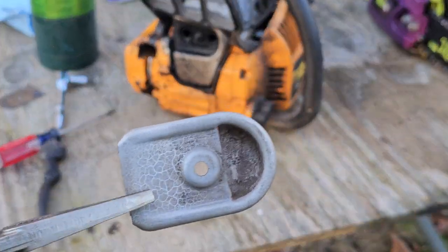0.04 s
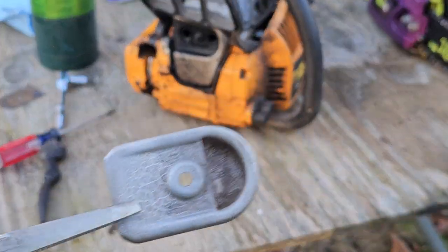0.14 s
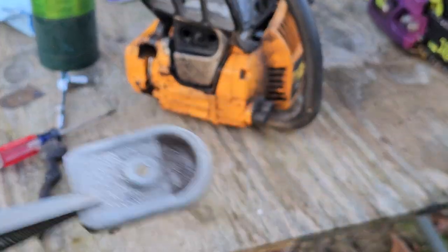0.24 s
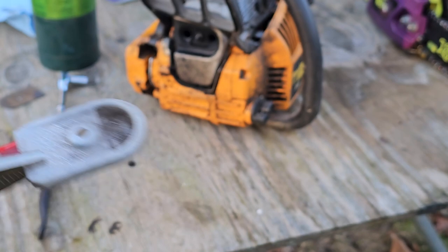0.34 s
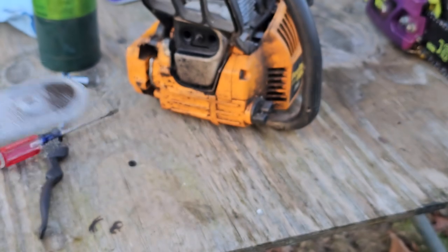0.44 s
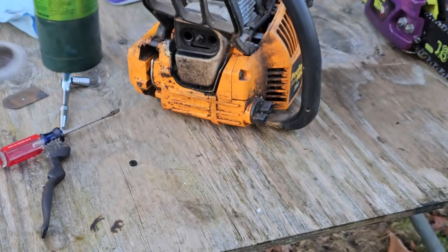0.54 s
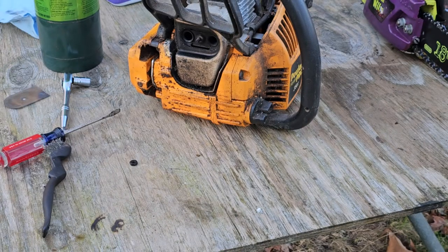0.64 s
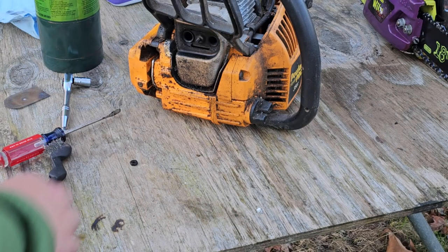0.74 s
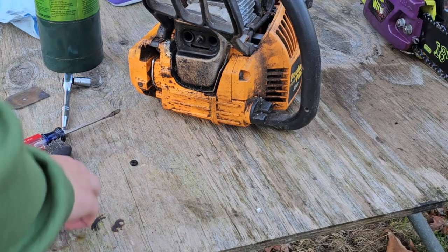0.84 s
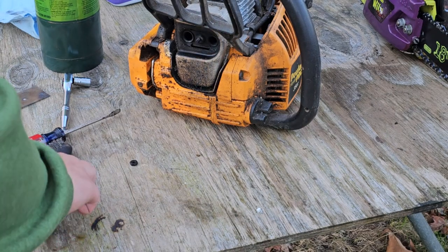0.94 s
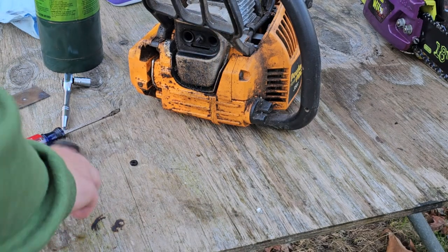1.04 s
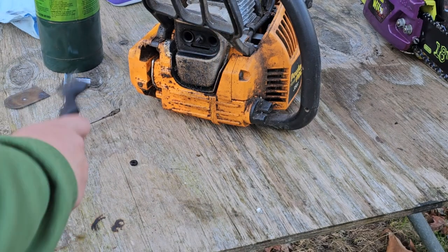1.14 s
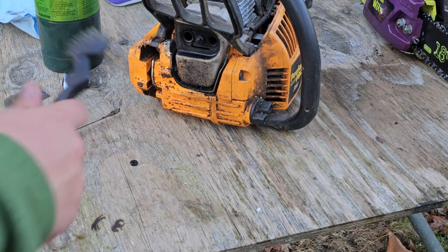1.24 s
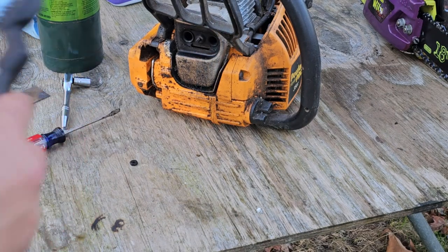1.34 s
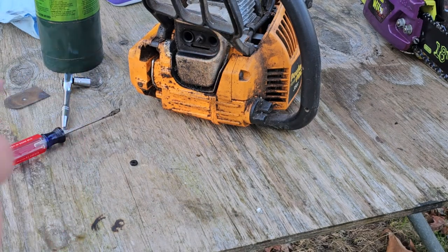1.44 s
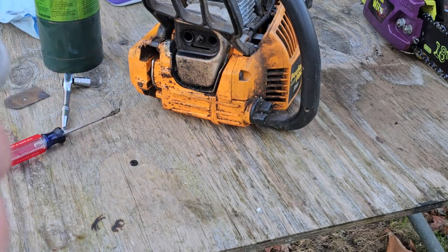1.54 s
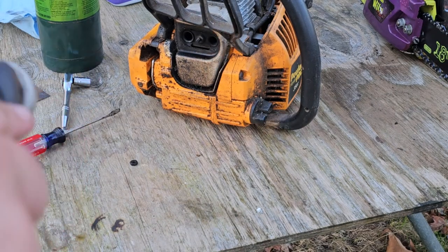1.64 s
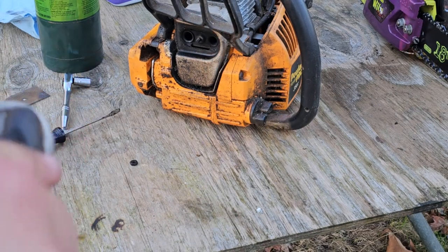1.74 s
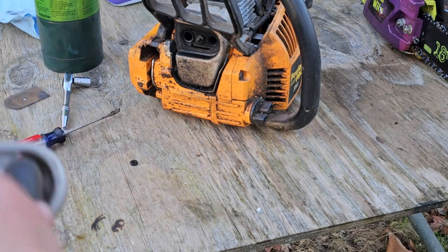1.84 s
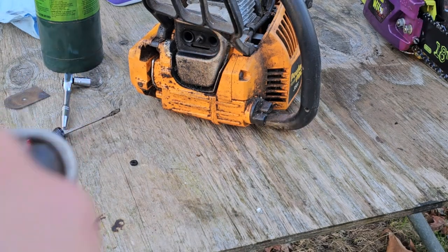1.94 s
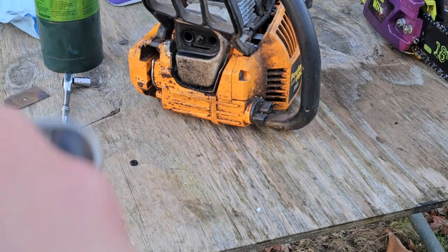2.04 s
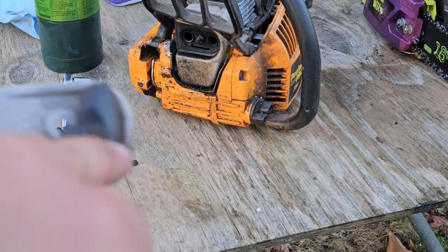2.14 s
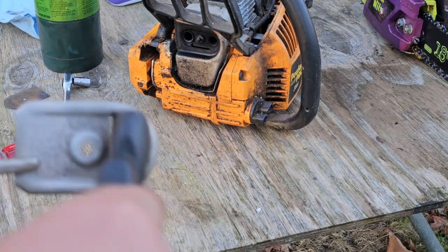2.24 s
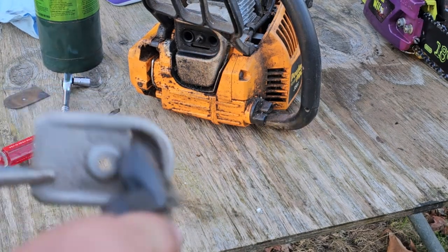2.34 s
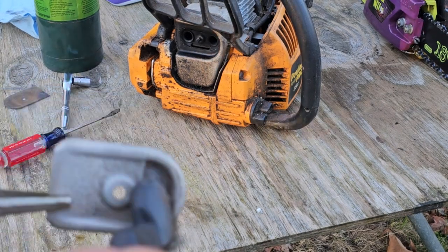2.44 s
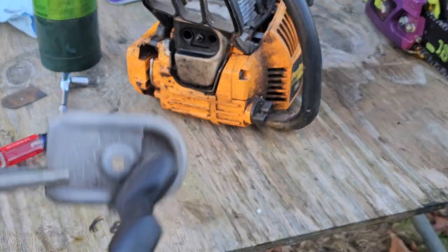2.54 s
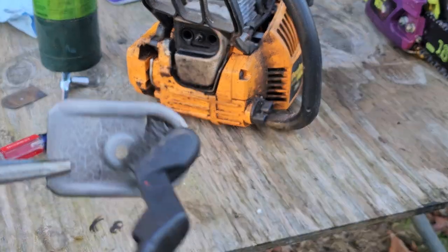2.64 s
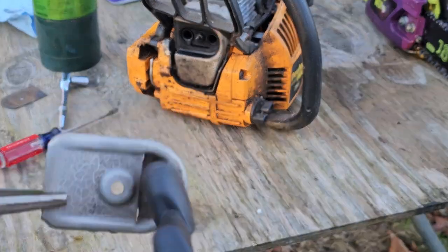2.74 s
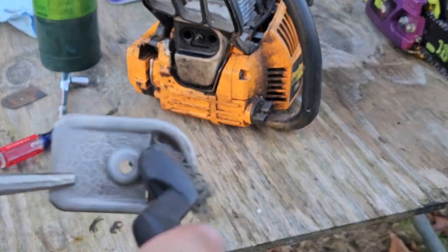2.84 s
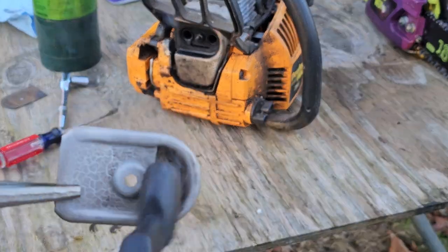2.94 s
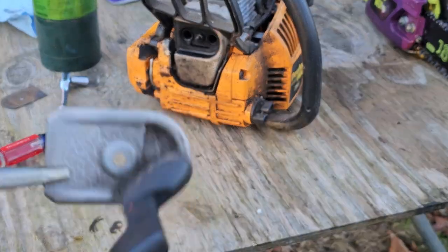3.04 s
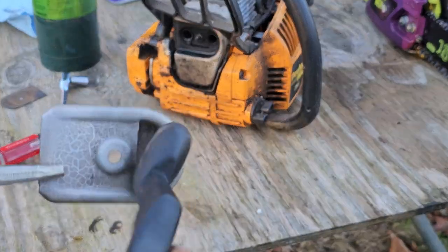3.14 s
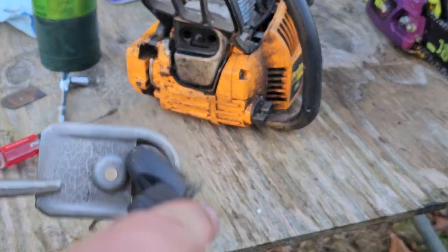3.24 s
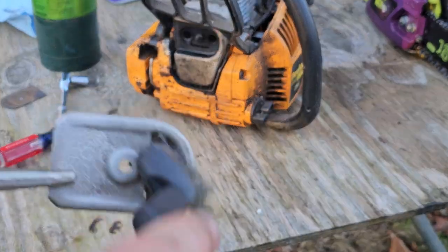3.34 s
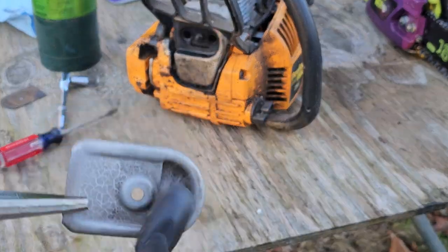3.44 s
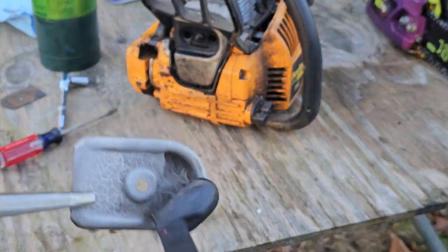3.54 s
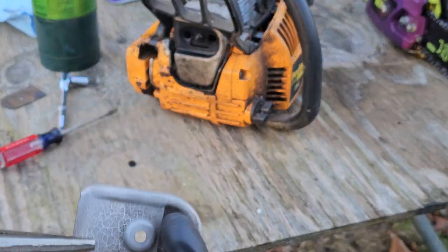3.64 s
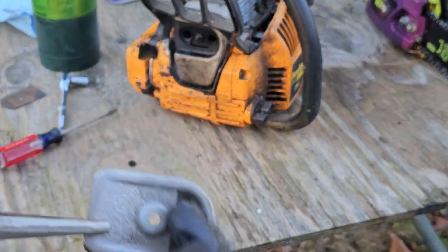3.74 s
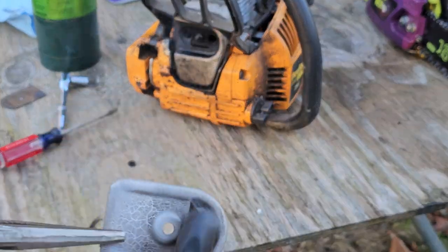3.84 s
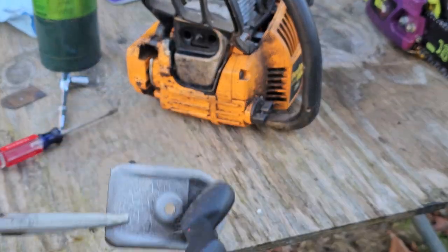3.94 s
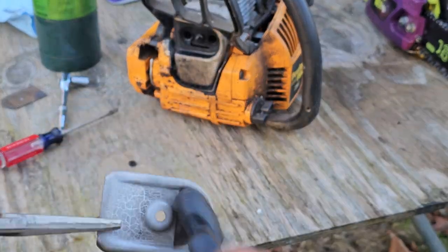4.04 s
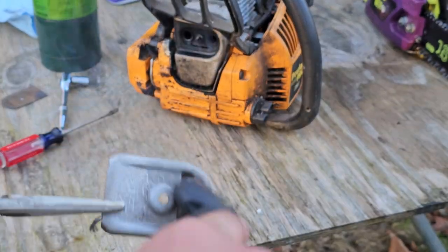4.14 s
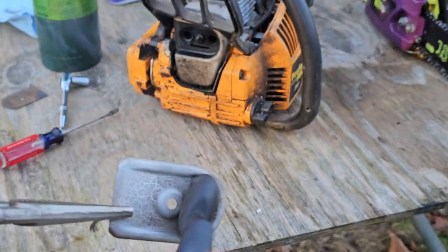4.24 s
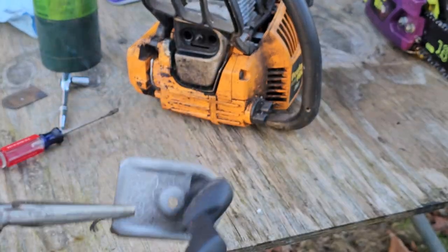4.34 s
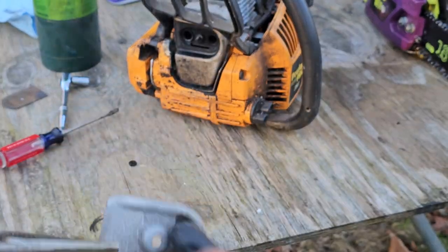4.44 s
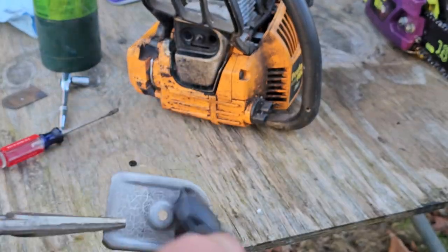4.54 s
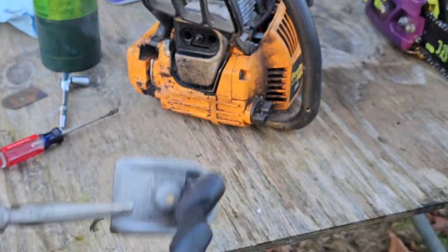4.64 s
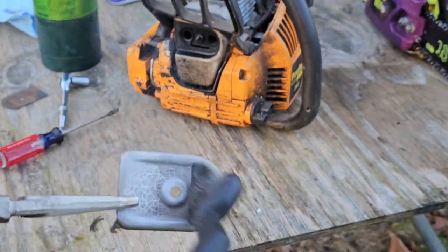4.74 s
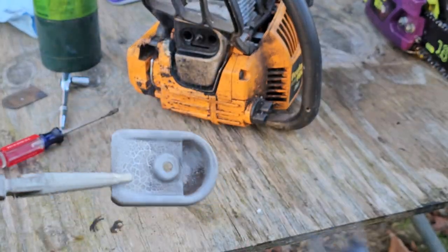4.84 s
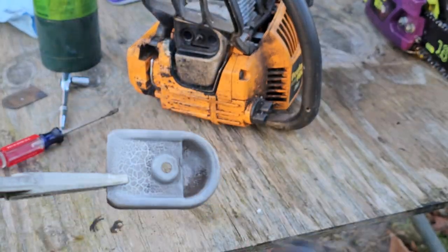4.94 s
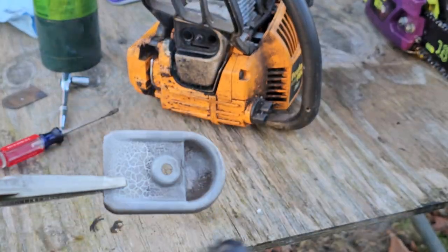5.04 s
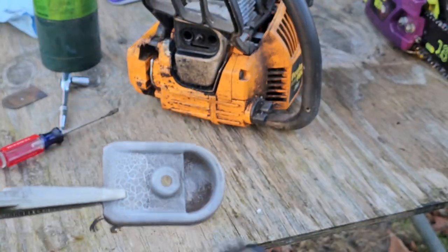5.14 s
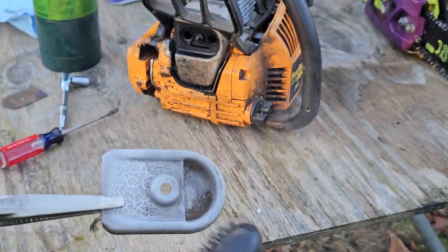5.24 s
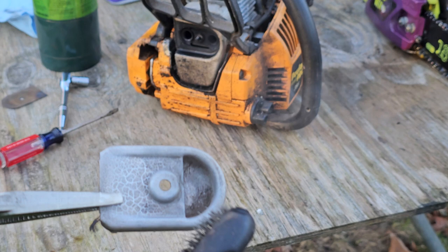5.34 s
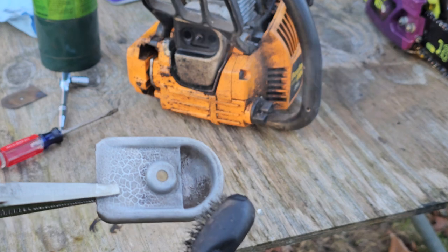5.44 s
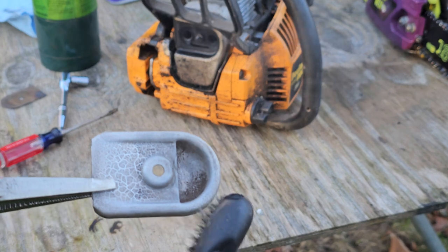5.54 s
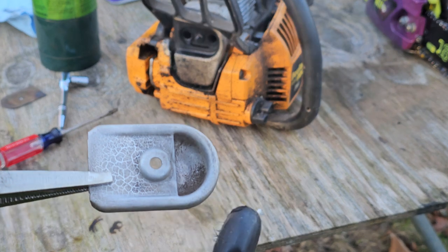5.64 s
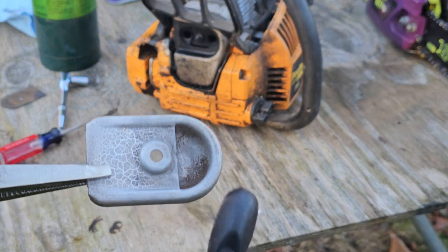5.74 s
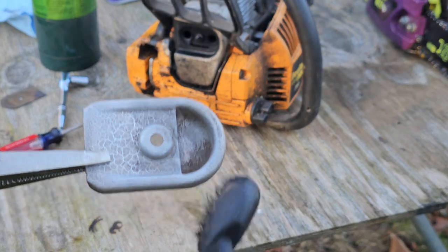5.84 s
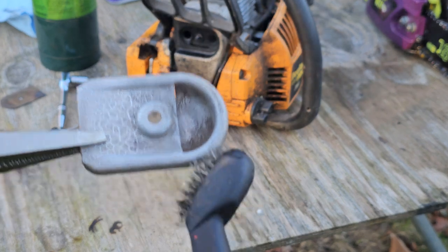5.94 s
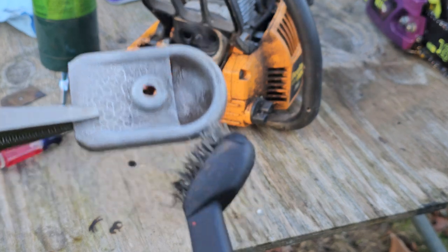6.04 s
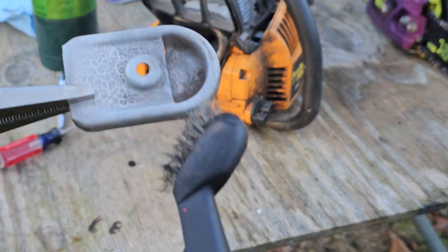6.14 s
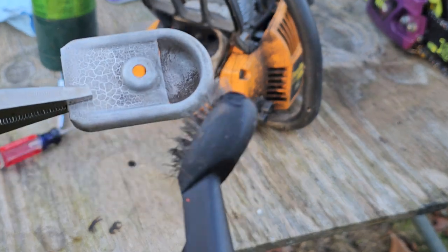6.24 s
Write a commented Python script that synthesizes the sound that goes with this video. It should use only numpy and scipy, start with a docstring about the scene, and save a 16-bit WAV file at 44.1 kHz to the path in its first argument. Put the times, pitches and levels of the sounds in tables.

```python
"""A distant engine drones first, sinking overall in pitch amid outdoor rush, rumble and faint cloth hiss: harmonics and noise.
A plastic-handled wire brush knocks on a plywood bench, then scrubs a pressed-steel muffler plate held in pliers.
Strokes swell and die with the hand: random wire flicks, bunched by stick-slip, drive the plate's resonances.
Tufts snap off the rim and shifting hands tick: short noise bursts excite modes. Two light rim touches come last."""
import sys
import numpy as np
from scipy import signal
from scipy.fft import rfft, irfft, next_fast_len
from scipy.io import wavfile
from scipy.ndimage import uniform_filter1d

SR = 44100
rng = np.random.default_rng(int(sys.argv[2]) if len(sys.argv) > 2 else 0)


def store_wav(level_fs):
    """Save 16-bit WAV to argv[1]."""
    pcm = np.round(np.clip(np.atleast_2d(level_fs), -1, 1) * 32767)
    wavfile.write(sys.argv[1], SR, pcm.T.astype(np.int16))


N = 278182
T = np.arange(N) / SR
SIZE = next_fast_len(N + SR // 4, True)  # leaves room for filter tails
FREQS = np.arange(SIZE // 2 + 1) * SR / SIZE
TOP_HZ = 15850  # upper edge of the recorded band


def undb(db):
    """Decibel law: amplitude gain grows tenfold every 20 dB."""
    return 10 ** (np.asarray(db) / 20)


def unit(x):
    """Normalization to a root-mean-square of 1."""
    return x / np.sqrt(np.mean(x ** 2))


def curves(rows):
    """Linear interpolation of each table column through time."""
    s, *columns = np.transpose(rows)
    return [np.interp(T, s, c) for c in columns]


def shape(points):
    """Spectral envelope: gain from f/Hz and level/dB points, interpolated over log frequency."""
    hz, db = np.transpose(points)
    return undb(np.interp(np.log(FREQS + 1), np.log(hz), db))


def below(hz):
    """Butterworth magnitude of order 8: a steep low-pass."""
    return 1 / np.sqrt(1 + (FREQS / hz) ** 16)


def above(hz):
    """Power complement of the low-pass: the two bands together conserve energy."""
    return np.sqrt(1 - below(hz) ** 2)


def modes(rows):
    """Modal superposition: resonance powers add, each peaked at f/Hz with width/Hz and level/dB."""
    power = 0
    for hz, width, db in rows:
        detuning = (FREQS ** 2 - hz ** 2) / (width * FREQS + 1)
        power = power + undb(2 * db) / (1 + detuning ** 2)
    return np.sqrt(power)


def causal(gain):
    """Minimum phase: the cepstrum is folded forward so a body rings only after it is struck."""
    cepstrum = irfft(np.log(gain + 1e-6), SIZE)
    cepstrum[1:SIZE // 2] *= 2
    cepstrum[SIZE // 2 + 1:] = 0
    return np.exp(rfft(cepstrum))


def through(x, response):
    """Linear filtering: the spectrum is multiplied by a frequency response."""
    return irfft(rfft(x, SIZE) * response, SIZE)[..., :N]


def walk(rate):
    """Smoothed random fluctuation of unit rms, built from steps at the given rate in Hz."""
    hold = max(int(SR / rate), 2)
    steps = np.repeat(rng.standard_normal(N // hold + 1), hold)
    return unit(uniform_filter1d(steps, hold)[:N])


def wide_noise(gain, alike_hz):
    """Diffuse noise: stereo coherence is high in the bass and falls with frequency."""
    mid, side = rng.standard_normal((2, N))
    side = through(side, FREQS / np.hypot(FREQS, alike_hz))
    return unit(through(np.array([mid + side, mid - side]), gain))


def swells(rows, swell_shape=1.61):
    """Motion envelope: each movement builds to its fastest moment and dies away."""
    out = np.zeros((len(rows), N))
    # a shape of 1 is pointed, 2 is bell-shaped
    for gain, (s, rise_s, fall_s, db, *_) in zip(out, rows):
        near = (T > s - 4 * rise_s) & (T < s + 4 * fall_s)
        age = T[near] - s
        width_s = np.where(age < 0, rise_s, fall_s)
        gain[near] = undb(db) * np.exp(-np.abs(age / width_s) ** swell_shape)
    return out


def burst(s, decay_s):
    """Exponentially decaying random-sign noise: a crunch, independent at each port."""
    age = np.maximum(T - s, 0)
    live = (T >= s) & (age < 10 * decay_s)
    signs = rng.choice([-1, 1], (2, live.sum()))
    out = np.zeros((2, N))
    out[:, live] = np.exp(-age[live] / decay_s) * signs
    return out


def blows(times, levels_db, ring, decay_s, gain_db):
    """Impact excitation: short contact forces set a resonant body ringing."""
    force = sum(undb(db) * burst(s, decay_s) for s, db in zip(times, levels_db))
    return undb(gain_db) * through(force, causal(unit(ring)))


def pops(per_s, spread_db):
    """Poisson-like impulses: most small, a few large."""
    chance, size = rng.random((2, N))
    return (chance < per_s / SR) * undb(spread_db * np.minimum(-np.log(1 - size), 3.5))


# distant engine's pitch before its waver: (t/s, firing rate f/Hz)
FIRING_RATE = [(0, 85.7), (.5, 84.26), (1.5, 81.6), (2, 78.7), (2.5, 78.17), (3.5, 73.95), (4, 74.6),
               (5.5, 71.8), (6.31, 70.9)]
# engine's fundamental before throb: (t/s, level/dB)
FUNDAMENTAL = [(0.0, -43.5), (0.14, -40), (0.4, -50.5), (0.49, -35), (0.58, -45), (0.77, -37),
               (0.88, -39.5), (1.02, -29.5), (1.11, -35), (1.95, -32), (2.12, -38.5), (2.18, -34),
               (2.7, -32.5), (2.93, -37.5), (3.02, -32), (3.76, -35.5), (3.81, -32.5), (4.23, -33.5),
               (4.27, -39), (4.37, -34.5), (5.37, -37.5), (5.46, -44.5), (5.75, -36), (6.31, -50)]
# engine's overtones, relative: (t/s, second harmonic level/dB, third harmonic level/dB)
OVERTONE_LEVELS = [(0, -59, -59.5), (1.05, -51, -61.5), (1.37, -56, -64.5), (1.61, -79, -55),
                   (2.2, -59, -60), (2.39, -52.5, -56), (3.14, -52.5, -62), (4, -51, -68),
                   (4.18, -59.5, -70), (4.58, -49, -68), (5.5, -44, -71.5), (6.31, -57.5, -71.5)]


def engine(second_db=-1, third_db=-3, upper_db=-10, waver=.006, flutter_db=2, throb_db=1.1, throb_rate=15):
    """Harmonic synthesis: phase is the integral of firing rate, and the harmonics swell and fade."""
    hz, = curves(FIRING_RATE)
    phase = 2 * np.pi * np.cumsum(hz * (1 + waver * walk(12))) / SR
    second, third = curves(OVERTONE_LEVELS)
    first = curves(FUNDAMENTAL)[0] + throb_db * walk(throb_rate)
    tone = undb(first) * np.sin(phase)
    tone += undb(second + second_db) * np.sin(2 * phase)
    for k in range(3, 8):
        level_db = third + (third_db if k == 3 else upper_db) + flutter_db * walk(14)
        tone += undb(level_db) * np.sin(k * phase + .5 * walk(10))
    return np.sqrt(2) * tone * undb([[.3], [-.3]])  # left, right


# outdoor rush, relative: (t/s, level/dB)
RUSH_LEVEL = [(0, -53), (1, -54), (2.9, -53), (3.7, -54.5), (4.9, -58), (5.2, -61.5), (6.31, -61.5)]
# spectrum of the open-air rush: (f/Hz, level/dB)
RUSH_COLOUR = [(160, -3.5), (280, -1.5), (360, -7), (480, 1), (650, -6), (900, -12.5), (2100, -20),
               (3600, -29.5), (6000, -41), (8000, -55), (10300, -54.5), (16000, -63)]
# spectrum of the outdoor rumble: (f/Hz, level/dB)
RUMBLE_COLOUR = [(20, -5), (35, -2), (48, 11), (70, 11.5), (105, 8), (135, 1), (200, -11), (300, -24),
                 (450, -53)]
# outdoor rumble, relative: (t/s, level/dB)
RUMBLE_COURSE = [(0, -58.5), (.5, -55.5), (1.5, -52), (2.2, -50), (3, -50.5), (4, -54), (5, -50),
                 (5.6, -61), (6.31, -53.5)]


def outdoors(rush_db=-0.5, rumble_db=3):
    """Diffuse-field noise: rush and rumble are spectrally shaped and follow slow level curves."""
    rush_level = curves(RUSH_LEVEL)[0] + rush_db + .5 * walk(22)
    rush = wide_noise(shape(RUSH_COLOUR) * below(9000), 440) * undb(rush_level)
    rumble = wide_noise(shape(RUMBLE_COLOUR), 540) * undb(curves(RUMBLE_COURSE)[0] + rumble_db)
    left_over_right = shape([(100, 1.08), (1300, 0.37), (4400, 6.9)])
    return through(rush + rumble, left_over_right ** np.array([[.5], [-.5]]))


# sleeves sliding as the arms move: (fastest moment t/s, speeding up t/s, slowing down t/s, level/dB)
ARM_MOVES = [(0, .1, 0.12, -68.5), (.86, 0.41, 0.17, -60), (1.3, .3, 0.42, -66.5),
             (4.97, 0.011, 0.023, -56.5), (4.98, 0.22, .12, -68.5), (6.3, 0.47, 0.17, -76)]
# spectrum of the cloth hiss: (f/Hz, level/dB)
CLOTH_COLOUR = [(2000, -7.5), (3500, -5.5), (5000, -2.5), (6500, -11), (7400, -1.5), (9200, -9),
                (10600, -11), (11700, 0.5), (13000, -3), (15300, -2.5)]


def sleeve(still_db=-87, left_db=1):
    """Friction noise: soft cloth hiss grows with arm movement over a constant floor."""
    sliding = np.sqrt(np.sum(swells(ARM_MOVES) ** 2, axis=0) + undb(2 * still_db))
    return wide_noise(shape(CLOTH_COLOUR), 2000) * sliding * undb([[left_db], [-left_db]])


# knocks of the plastic brush, relative: (t/s, handle ring level/dB, bench thud level/dB)
BRUSH_KNOCKS = [(1.0238, -39.5, -43), (1.03, -48, -29.5), (1.036, -42.5, -36), (1.042, -45, -35),
                (1.046, -44.5, -31), (2.08, -48.5, -83), (2.434, -47.5, -70), (2.693, -41.5, -60)]
# resonances of the brush handle: (f/Hz, width f/Hz, level/dB)
HANDLE_MODES = [(725, 80, 2), (1038, 24, 8), (1290, 89, -1), (1720, 160, -4), (2430, 400, -9.5)]
# resonances of the plywood bench: (f/Hz, width f/Hz, level/dB)
BENCH_MODES = [(205, 21, 4), (253.6, 22, -7), (477, 33, -1)]


def knocks():
    """Impact and modal response: the plastic handle rings as it knocks and the plywood thuds."""
    times, handle_db, bench_db = np.transpose(BRUSH_KNOCKS)
    handle_ring = modes(HANDLE_MODES) / np.hypot(1, FREQS / 2500)
    bench_ring = modes(BENCH_MODES) * below(1500)
    handle = blows(times, handle_db, handle_ring, decay_s=0.0035, gain_db=4.5)
    return handle + blows(times, bench_db, bench_ring, decay_s=.004, gain_db=-2)


# dry ticks as brush and pliers shift in the hands, relative: (t/s, level/dB, centre f/Hz)
HAND_TICKS = [(1.39, -38, 3700), (5.174, -58, 13000), (5.415, -73, 11030)]


def ticks(decay_s=.0025, width_hz=3000, tick_db=-8):
    """Heavily damped resonance: each short crunch excites one broad mode."""
    return sum(blows([s], [db], modes([(hz, width_hz, 0)]), decay_s, tick_db) for s, db, hz in HAND_TICKS)


# brush strokes, levels before unevenness:
# (fastest moment t/s, speeding up t/s, slowing down t/s, scrub level/dB, low-ring share level/dB)
BRUSH_STROKES = [(1.69, 0.032, 0.015, -47, -6), (1.903, 0.03, 0.039, -44.5, -3),
                 (2.061, 0.051, 0.077, -45, -5.5), (2.15, 0.026, 0.031, -43.5, -8),
                 (2.225, 0.019, .015, -49.5, -1.5), (2.308, 0.03, .14, -40.5, -6.5),
                 (2.422, 0.0088, 0.011, -39.5, 1), (2.57, 0.057, 0.35, -39.5, -7.5),
                 (2.689, 0.11, .025, -34.5, -3), (2.793, 0.056, 0.06, -35, -3),
                 (3.03, 0.043, 0.089, -37, -7.5), (3.108, 0.074, 0.15, -35.5, -6),
                 (3.245, 0.027, 0.068, -32.5, -6), (3.465, 0.028, 0.14, -35.5, -7),
                 (3.575, 0.098, 0.039, -37.5, -1), (3.704, 0.057, 0.051, -33.5, -4.5),
                 (3.868, 0.0067, .03, -42.5, -7.5), (3.952, 0.067, 0.054, -32.5, -7.5),
                 (4.098, .06, 0.067, -34.5, -6.5), (4.351, 0.075, .04, -36, -4),
                 (4.475, .032, 0.023, -30.5, -4.5), (4.517, 0.01, 0.048, -40.5, -6.5),
                 (4.7, 0.043, 0.039, -34, -5), (4.789, .05, 0.029, -38.5, -3.5),
                 (4.841, .04, .014, -43, -12)]


def hand(uneven_db=1.3, uneven_rate=40, resting_db=-60):
    """Power addition: overlapping strokes give an uneven scrub level and a weighted low-ring share, in dB."""
    # the resting level lets the wires creep between strokes
    power = swells(BRUSH_STROKES) ** 2 + undb(2 * resting_db) / len(BRUSH_STROKES)
    total = power.sum(axis=0)
    ring_db = np.array(BRUSH_STROKES)[:, 4] @ power / total
    return 10 * np.log10(total) + uneven_db * walk(uneven_rate), ring_db


def bristles(level_db, flicks_per_s=9000, spread_db=1.5, slips_per_s=520, slip_spread_db=0.4,
             slip_s=0.0048, drag=0.79):
    """Stick-slip friction: slipping tufts bunch random wire flicks into crunches, fewer in slow strokes."""
    speed = undb(np.minimum(level_db + 35.5, 0) * 0.29)
    decay = np.exp(-1 / (slip_s * SR))
    slips = signal.lfilter([1], [1, -decay], pops(slips_per_s * speed, slip_spread_db))
    grip = drag + unit(slips / np.sqrt(speed))
    # every wire points its own way, so the two ports hear it with unrelated signs
    signs = rng.choice([-1, 1], (2, N))
    return unit(pops(flicks_per_s, spread_db) * grip * signs)


def pings(per_s=24, spread_db=-9.0, width_hz=420, count=16):
    """Resonance of plucked wires: each length twangs at its own pitch; per_s counts plucks per wire."""
    twangs = 0
    for hz in np.linspace(3800, 15400, count):
        twangs = twangs + signal.lfilter(*signal.iirpeak(hz, hz / width_hz, SR), pops(per_s, spread_db))
    return unit(twangs)


def wander(x, level_db, depth_db=3, rate=35, dulling=0.15, firm_db=-36, count=10):
    """Time-varying filtering: bending, crossing wires shift the colour; light strokes have less top end."""
    step_hz = TOP_HZ / count
    spectrum = rfft(x, SIZE)
    top_db = dulling * np.clip(level_db - firm_db, -20, 20)
    out = 0
    for k in range(count + 1):
        # overlapping triangular bands
        band = np.maximum(1 - np.abs(FREQS / step_hz - k), 0)
        gain_db = depth_db * np.tanh(walk(rate)) + top_db * (k / count) ** 2
        out = out + irfft(spectrum * band, SIZE)[:, :N] * undb(gain_db)
    return out


# resonances of the steel plate: (f/Hz, width f/Hz, level/dB)
PLATE_MODES = [(1220, 80, -11.5), (2305, 60, -2), (2960, 65, -9), (3725, 60, 1), (4705, 55, 1),
               (5310, 120, 1), (5645, 100, 0), (7490, 380, -9), (7930, 45, -11), (9840, 60, -7),
               (11080, 95, -4), (11505, 80, -3), (12170, 110, -1), (13300, 190, -8), (14055, 90, 0),
               (14600, 120, -6), (15255, 90, 1), (15585, 110, 2)]
# strokes at the edge of the bowl wake the mode near 3 kHz: (t/s, its extra level/dB)
BOWL_EDGE = [(4.1, -0.5), (4.3, 7.5)]


def scrub(scratch, split_hz=6300, ping_db=-13, turns_db=3.0, turns_rate=16):
    """Forced modal vibration: flicking wires drive the plate, with a low-ring share set by each stroke."""
    level_db, ring_db = hand()
    # the wires meet the plate at once and leave it one by one
    landing = np.clip((T - 1.665) / .004, 0, 1)
    lifting = np.clip((4.895 - T) / 0.056, 0, 1)
    stroke = undb(level_db) * landing * lifting
    force = bristles(level_db) * stroke
    ring = np.clip(undb(ring_db), .05, .95)
    halves = (ring, below(split_hz), False), (np.sqrt(1 - ring ** 2), above(split_hz), True)
    out = undb(ping_db) * pings() * stroke
    edge_db, = curves(BOWL_EDGE)
    for share, band, upper in halves:
        rows = [row for row in PLATE_MODES if (row[0] > split_hz) == upper]
        response_rms = np.sqrt(np.mean(modes(rows) ** 2 + (scratch * band) ** 2))
        drive = force * share / response_rms
        out = out + wander(through(drive, causal(scratch * band)), level_db)
        for hz, width, db in rows:
            # the point of contact moves over the plate, so the modes take turns to stand out
            reach_db = turns_db * walk(turns_rate) - 1.2
            reach_db += edge_db * np.exp(-((hz - 2960) / 300) ** 2)
            out += signal.lfilter(*signal.iirpeak(hz, hz / width, SR), drive * undb(db + reach_db))
    return out


# spectrum of the wires' dry scratch, relative: (f/Hz, level/dB)
SCRATCH_COLOUR = [(250, -24), (440, -4.5), (800, -46.5), (1200, -7), (1700, -12), (2600, -6), (4000, 4.5),
                  (6500, 2), (7700, 11), (9000, -2), (10400, -8.5), (11700, 7), (13000, -5), (15700, 5.5)]


def dry_scratch():
    """Broadband contact response: the spectral envelope of wires scraping without plate ring."""
    return shape(SCRATCH_COLOUR) * below(14240)


# tufts snapping off the rim, relative: (t/s, low ring level/dB, middle level/dB, top level/dB)
TUFT_SNAPS = [(1.6687, -35.5, -39, -46), (1.8116, -43, -37.5, -32), (1.8724, -48, -25.5, -21),
              (2.0295, -28.5, -45, -32), (2.0584, -31, -52, -38), (2.1112, -38, -38, -26.5),
              (2.4207, -29.5, -46, -22), (2.4334, -25.5, -55, -43), (2.498, -35, -37, -30),
              (2.5195, -32, -32, -25), (2.6889, -17.5, -22, -13), (2.7824, -33, -23, -40),
              (3.1053, -22, -42, -22), (3.149, -35.5, -37, -24), (3.158, -25, -48, -15),
              (3.2376, -21, -37, -30.5), (3.3989, -48.5, -35, -29), (3.4339, -44.5, -39, -34),
              (3.8579, -39, -46, -20.5), (4.1115, -25, -28, -12), (4.265, -41.5, -33, -30),
              (4.4375, -30.5, -34.5, -27), (4.6453, -38, -33.5, -28.5), (4.786, -25, -21.5, -19.5)]


def snaps(plate, decay_s=0.004, snap_db=-8.5):
    """Impulsive release: a tuft slips off the rim and wakes the plate's low, middle and top modes."""
    times, *levels_db = np.transpose(TUFT_SNAPS)
    bands = below(6000), above(6000) * below(11000), above(11000)
    return sum(blows(times, db, plate * band, decay_s, snap_db) for db, band in zip(levels_db, bands))


# light touches of the rim, relative: (t/s, level/dB)
RIM_TOUCHES = [(6.081, -49), (6.101, -62.5)]
# resonances of the rim, squared when played: (f/Hz, width f/Hz, level/dB)
RIM_MODES = [(5590, 80, -1.5), (9810, 110, -8), (15600, 160, -4)]


def rim_touches():
    """Selective modal excitation: squaring the response leaves ring with little click."""
    return blows(*np.transpose(RIM_TOUCHES), modes(RIM_MODES) ** 2, decay_s=0.0065, gain_db=-8.5)


# left minus right for the close sounds: (f/Hz, level difference/dB)
PORT_BALANCE = [(1000, 4), (1900, 2), (2300, 11.5), (3300, 4), (4000, 4.5), (4850, 9.5), (6000, 7),
                (8000, 3.5), (8900, 28), (9900, 4), (11100, -4), (13100, 6.5), (14100, -4.5), (15600, 8)]


def ports(x, alike_hz=8000, lag_s=0.00019):
    """Interaural-type cues at two microphone ports: bass coherence, earlier left arrival, housing shading."""
    apart = FREQS / np.hypot(FREQS, alike_hz)
    mid = rfft(x[0] + x[1], SIZE)
    side = rfft(x[0] - x[1], SIZE) * apart
    pair = np.array([mid + side, mid - side]) / np.sqrt(2 + 2 * apart ** 2)
    lag = np.exp(-2j * np.pi * FREQS * np.array([[0], [lag_s]]))
    shade = shape(PORT_BALANCE) ** np.array([[.5], [-.5]])
    shade = shade / np.sqrt(np.mean(shade ** 2, axis=0))
    return irfft(pair * lag * shade, SIZE)[:, :N]


def scene(scratch_db=-13, snap_scratch_db=-3):
    """Superposition: brush and plate close by, engine and open air behind."""
    background = engine() + outdoors() + sleeve()
    handling = knocks() + ticks()
    scratch = dry_scratch()
    metal = scrub(undb(scratch_db) * scratch)
    metal += snaps(np.hypot(modes(PLATE_MODES), undb(snap_scratch_db) * scratch))
    metal += rim_touches()
    return ports(metal + handling) + background


def record(dry):
    """Band limitation: the recorder's elliptic low-pass cuts the top steeply."""
    return signal.sosfilt(signal.ellip(12, .2, 70, TOP_HZ, fs=SR, output="sos"), dry)


dry = scene()
out = record(dry)
store_wav(out)
```